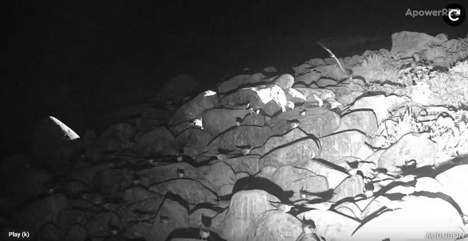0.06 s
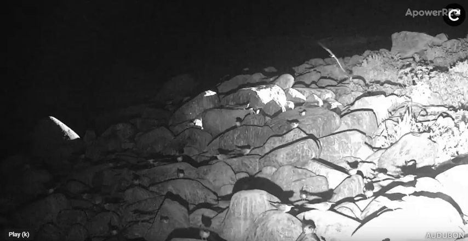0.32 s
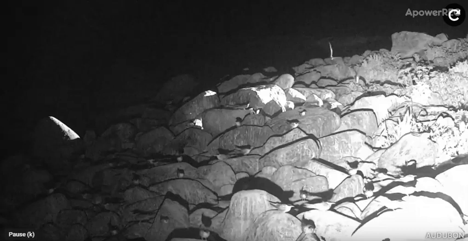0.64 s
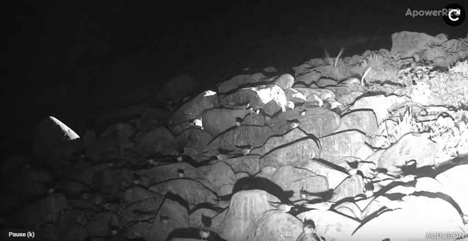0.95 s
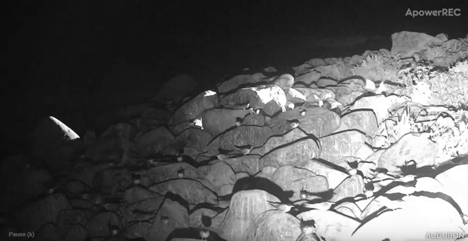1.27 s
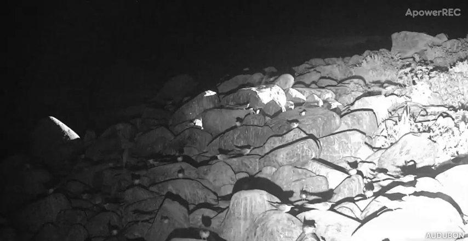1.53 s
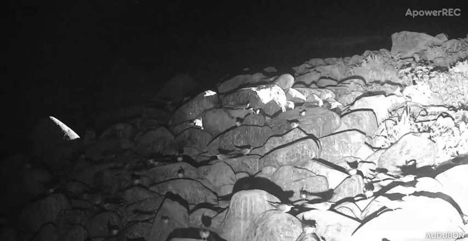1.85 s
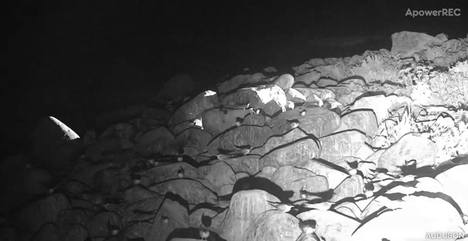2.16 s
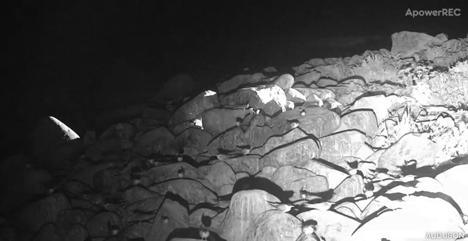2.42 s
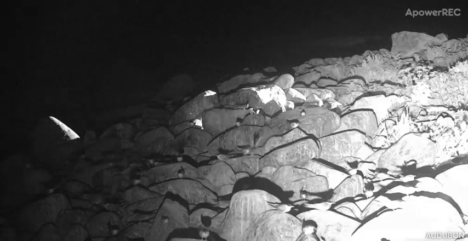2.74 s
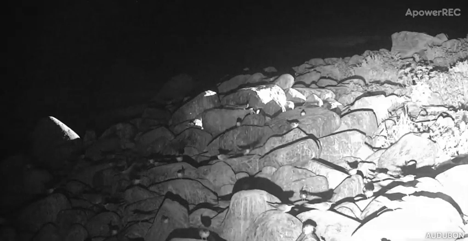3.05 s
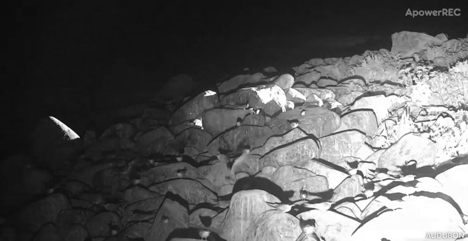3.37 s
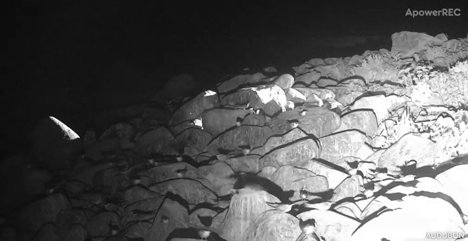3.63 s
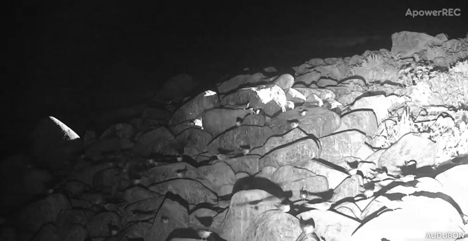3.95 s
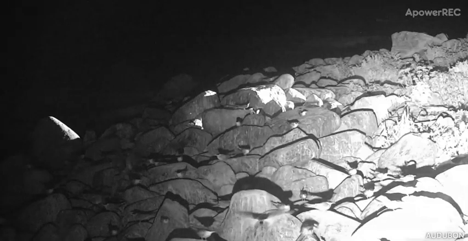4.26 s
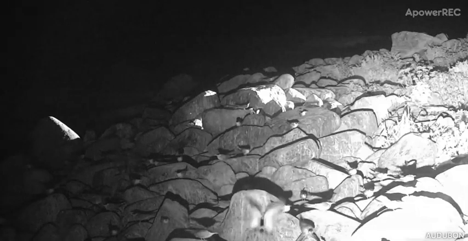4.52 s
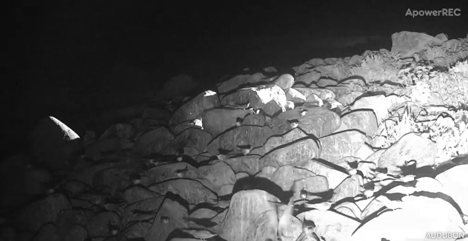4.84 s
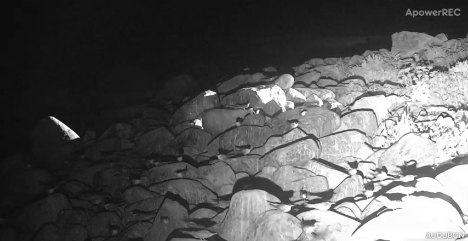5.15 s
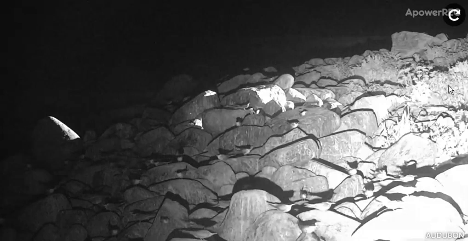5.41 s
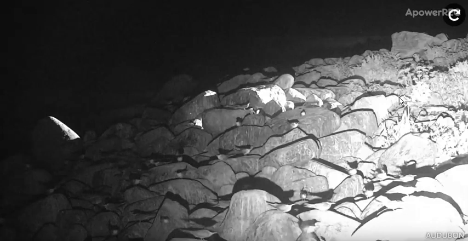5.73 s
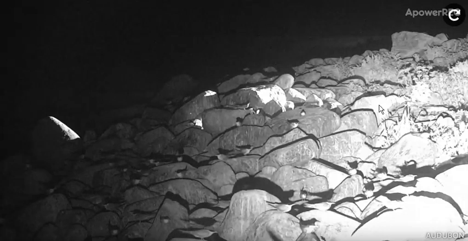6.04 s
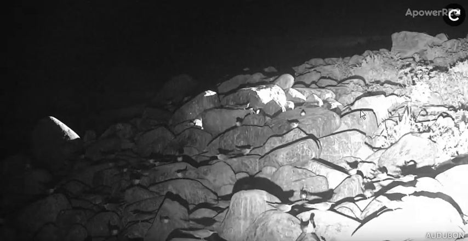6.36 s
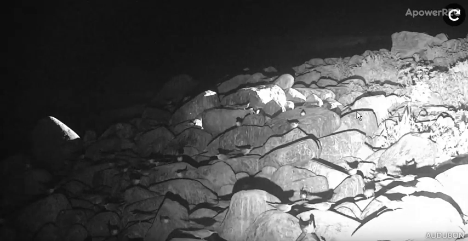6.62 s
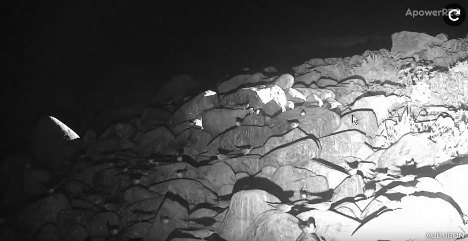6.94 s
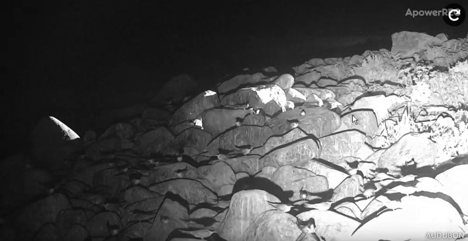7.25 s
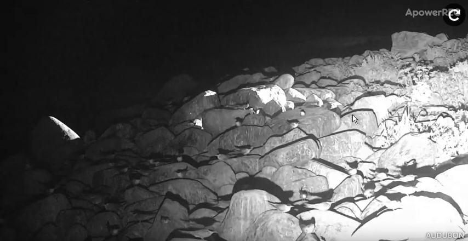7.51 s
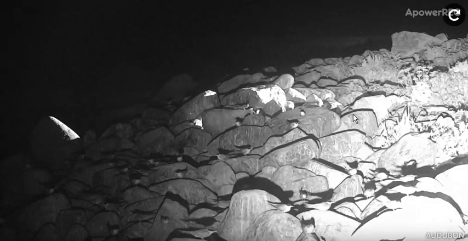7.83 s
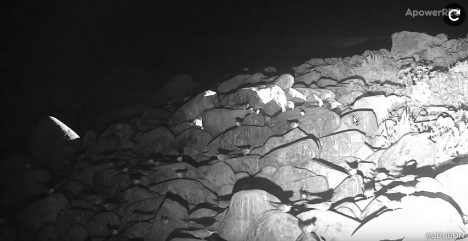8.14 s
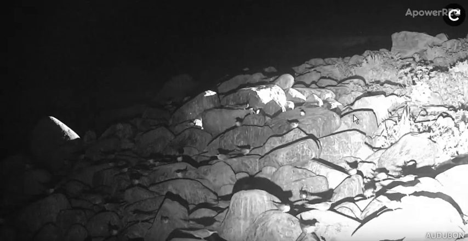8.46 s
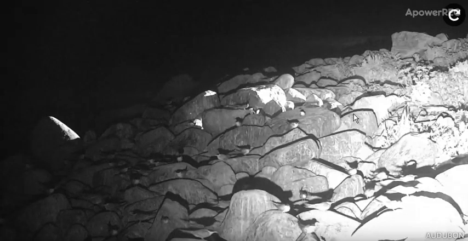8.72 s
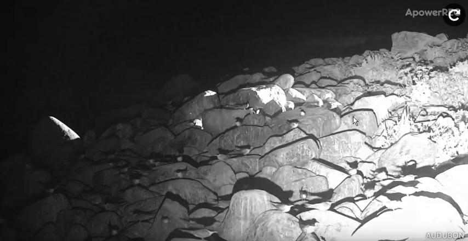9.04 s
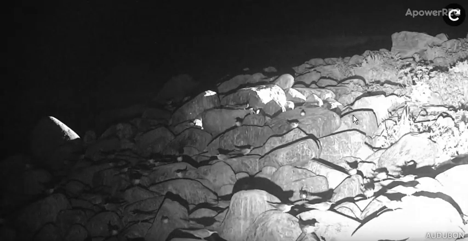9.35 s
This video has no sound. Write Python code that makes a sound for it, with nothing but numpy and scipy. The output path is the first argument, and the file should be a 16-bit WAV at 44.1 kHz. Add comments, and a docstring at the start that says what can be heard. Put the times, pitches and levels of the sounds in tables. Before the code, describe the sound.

After a moment of silence, a fixed microphone picks up seabirds calling among shoreline boulders at night. High wails crack into rasps over steady, hoarse chatter and scattered squeals. Later come fast, fluttering growls, a rising run of clucks and a brief, close shriek, the loudest sound. The whole scene is fairly quiet, backed by the far colony, a low wash of surf, soft wind, hiss and slight electrical buzz.

```python
"""A rocky shore at night, in a seabird colony, on the microphone of a fixed camera that comes on late.
Close by, one bird wails and breaks into rasps, one growls, one chatters, one clucks; others squeal among
the boulders and one shrieks. The voices are harmonic tones and snaps of the syrinx, shaped by the throat
and scattered by the rocks. Farther off lie the rest of the colony and the surf; at the microphone,
slow wind pressure, hiss and a thin mains buzz."""
import sys
import numpy as np
from scipy import signal
from scipy.fft import rfft, irfft, next_fast_len
from scipy.io import wavfile
from scipy.ndimage import map_coordinates

SR = 44100
rng = np.random.default_rng(int(sys.argv[2]) if len(sys.argv) > 2 else 0)


def wav_record(signal):
    """Record a signal, one row per channel, as 16-bit PCM in the file named by sys.argv[1]."""
    frames = np.transpose(np.atleast_2d(signal))
    bounded = np.clip(frames, -1, 1)
    # unit amplitude maps onto the largest positive 16-bit level
    quanta = np.round(bounded * 32767).astype(np.int16)
    wavfile.write(sys.argv[1], SR, quanta)


N = 422478
TIME = np.arange(N) / SR


def amp(db):
    """Decibels to gain."""
    return 10 ** (np.asarray(db) / 20)


def unit(x):
    """Scale to rms 1."""
    return x / np.sqrt(np.mean(x ** 2) + 1e-20)


def along(points, hz):
    """Read (frequency [Hz], value) points on a log axis."""
    f, v = np.transpose(points)
    return np.interp(np.log(hz + 1), np.log(f + 1), v)


def span(length):
    """The seconds since the start of a call, one per sample."""
    return np.arange(round(length * SR)) / SR


def envelope(t, attack_s, release_s):
    """Gain that rises, holds and falls."""
    return np.clip(np.minimum(t / attack_s, (t[-1] - t) / release_s), 0, 1)


def wobble(rate, size):
    """A smooth random curve, rate knots a second."""
    knots = rng.standard_normal(int(size * rate / SR) + 4)
    return map_coordinates(knots, [np.arange(size) * rate / SR], mode="nearest")


def add(track, start, x, fade_s=.019):
    """Mix x into the track at start seconds, with soft ends."""
    k = np.arange(len(x))
    part = track[round(start * SR):][:len(x)]
    part += (x * np.clip(np.minimum(k, k[::-1]) / (fade_s * SR), 0, 1))[:len(part)]


def filtered(x, response):
    """Filter x by a gain that is a function of frequency."""
    m = next_fast_len(x.shape[-1] + 8192)
    return irfft(rfft(x, m) * response(np.fft.rfftfreq(m, 1 / SR)), m)[..., :x.shape[-1]]


def coloured(x, spectrum):
    """Shape x by (frequency [Hz], gain [dB]) points; rms 1."""
    return unit(filtered(x, lambda hz: amp(along(spectrum, hz))))


def noise(spectrum):
    """Coloured noise of rms 1."""
    return coloured(rng.standard_normal(N), spectrum)


def wide_noise(spectrum, side_db):
    """Stereo noise from independent mid and side signals."""
    return noise(spectrum) + amp(side_db) * noise(spectrum) * np.array([[1], [-1]])


def throat(x, modes):
    """Ring x through resonances (centre [Hz], width [Hz], gain [dB]); rms 1."""
    m = next_fast_len(len(x) + 4096)
    f = np.abs(np.fft.fftfreq(m, 1 / SR))
    gain = sum(amp(db) / (1 + 2 * ((f - hz) / width) ** 2) for hz, width, db in modes)
    causal = np.exp(np.conj(signal.hilbert(np.log(gain))))  # the ring follows each snap
    causal *= f ** 2 / (f ** 2 + 500 ** 2)  # a small beak radiates no bass
    return unit(np.fft.ifft(np.fft.fft(x, m) * causal).real[:len(x)])


def creak(size, pulse_hz, jitter, breath):
    """Uneven snaps of the syrinx mixed with rushing air."""
    cycles = np.cumsum(pulse_hz * np.exp(jitter * wobble(pulse_hz, size))) / SR + rng.random()
    snaps = np.diff(np.floor(cycles), prepend=0) * amp(1.04 * wobble(pulse_hz, size))
    return unit(snaps) + breath * rng.standard_normal(size)


def flutter(size, rate_hz, depth_db, drift=.027):
    """A nearly regular throb of the air stream, rms 1."""
    cycles = np.cumsum(rate_hz * (1 + drift * wobble(36, size))) / SR + rng.random()
    return unit(amp(depth_db * np.cos(2 * np.pi * cycles)))


def partials(pitch, rough):
    """Six harmonics of rms 1, one a row; roughness shakes their pitch and strength."""
    size = len(pitch)
    shake = 1 + .08 * rough * wobble(900, size) + .005 * wobble(45, size)
    phase = 2 * np.pi * np.cumsum(pitch * shake) / SR
    return np.array([unit(np.sin(k * phase) * amp(3.45 * min(k, 3) * rough * wobble(300, size)))
                     for k in range(1, 7)])


def harmonic_gains(pitch, colour):
    """Each harmonic's gain through a throat colour (frequency [Hz], gain [dB])."""
    return amp(along(colour, np.outer(np.arange(1, 7), pitch)))


def voiced(pitch, rough, colour):
    """A harmonic voice through a throat colour, with steady power."""
    gains = harmonic_gains(pitch, colour)
    return np.sum(partials(pitch, rough) * gains, axis=0) / np.linalg.norm(gains, axis=0)


def cry(length, top_hz, fall, throat_hz):
    """An arched cry carried by the harmonic nearest the throat resonance; it cracks as it drops."""
    u = span(length) / length
    crest = .287  # share of the length at which the arch is highest
    pitch = top_hz * (1 - fall * ((u - crest) / (1 - crest)) ** 2)
    hoarseness = top_hz / throat_hz  # cries on the fundamental are hoarse, on a high harmonic clear
    rough = .46 * hoarseness + (1 - pitch / top_hz)
    pitch *= 1 + .0222 * hoarseness ** 2 * wobble(118.8, len(u))
    colour = np.array([(.5, -10), (1, 0), (1.35, -16), (2.4, -24), (3.5, -40)]) * [throat_hz, 1]
    return unit(amp(3.2 * wobble(69, len(u)))) * voiced(pitch, rough, colour)


def boulders(x, side_db, t60, wet_db=-10):
    """Near rocks scatter the sound and widen it; the slope adds a faint long tail."""
    t = span(.5)
    tail = lambda decay_s: unit(rng.standard_normal(len(t)) * amp(-60 * t / decay_s)) / np.sqrt(len(t))
    echo = lambda db: signal.fftconvolve(x, amp(db) * tail(t60) + amp(-19) * tail(.3))[:N]
    return x + echo(wet_db) + echo(side_db) * np.array([[1], [-1]])


def hiss():
    """Steady hiss, largely separate in each channel."""
    # hiss spectrum (frequency [Hz], gain [dB])
    spectrum = [(150, -50), (400, -8), (900, 2), (3000, 4), (6000, 2), (9000, -.5), (15000, -1),
                (15900, -18)]
    return amp(-69.5) * wide_noise(spectrum, side_db=1.5)


def buzz(mains_hz=60.14):
    """The mains supply leaks a few sharp spikes each half cycle."""
    # switching spikes (place in the half cycle [0-1], relative level [dB])
    switching = [(0.16, 32.5), (.855, 33), (1, -14.5)]
    spikes = np.zeros(N)
    for place, db in switching:
        samples_away = ((2 * mains_hz * TIME - place + .5) % 1 - .5) * SR / (2 * mains_hz)
        spikes += amp(db) * np.sinc(samples_away) * np.exp(-(samples_away / 8) ** 2)
    colour = [(30, -17), (120, 11.5), (800, 2.5), (5000, 5.5), (11000, .5), (15500, -3)]
    return amp(-66) * coloured(spikes * amp(1.5 * wobble(300, N)), colour)


def wind():
    """Slow gusts press on the microphone, in mono and mostly below hearing."""
    # gusts (time [s], half width [s], relative level [dB])
    gusts = [(1.3, 0.17, -56), (1.8, 0.11, -46), (2.02, 0.12, -40.5), (2.4, 0.27, -51.5), (4.7, 0.14, -48),
             (5.1, 0.29, -52.5), (6.6, .4, -56.5), (7.8, 0.11, -56), (8.7, 0.6, -58.5)]
    # buffeting spectrum (frequency [Hz], gain [dB])
    buffet = [(1, 7), (4, 22.5), (10, 5.5), (20, -8), (30, -11.5), (45, -28), (65, -29), (120, -42),
              (400, -102), (2000, -120)]
    calm = amp(-69)
    pressure = calm + sum(amp(db) * np.exp(-((TIME - s) / width) ** 2) for s, width, db in gusts)
    return amp(23) * pressure * noise(buffet)


def surf():
    """Distant surf: a low wash, nearly mono, that slowly swells and sinks."""
    # spectrum of the wash (frequency [Hz], gain [dB])
    spectrum = [(26, -32), (45, -6), (59, -9.5), (99, -8), (141, -15.5), (193, -11.5), (277, -17.5),
                (347, -11.5), (384, -17), (424, -14), (481, -23), (580, -14), (634, -19), (774, -28),
                (900, -31), (1170, -22), (1980, -120)]
    # swell of the sea (time [s], level [dB])
    swell = [(.6, -61), (1.6, -66), (2.7, -64.5), (3.6, -62.5), (5, -62), (7.7, -60.5), (9.5, -62.5)]
    wash = wide_noise(spectrum, side_db=-22)
    return amp(np.interp(TIME, *np.transpose(swell)) + .38 * wobble(2.7, N)) * wash


def colony():
    """Many far birds merge into a restless rattle."""
    # spectrum of the far voices (frequency [Hz], gain [dB])
    far_voices = [(700, -11.5), (950, 3.5), (1250, 8.5), (1650, 3), (2300, 5), (3100, 2.5), (4200, -11.5),
                  (6500, -27), (10000, -56)]
    restless = amp(1.7 * wobble(12, N) + 2.2 * wobble(130, N))
    return amp(-60.5) * unit(noise(far_voices) * restless)


def squeals():
    """Birds among the boulders throw in short arched cries."""
    # cries (time [s], length [s], top pitch [Hz], fall [share of pitch], relative level [dB],
    # throat resonance [Hz])
    calls = [(0.588, 0.024, 954, .01, -48.5, 1130), (.70, .062, 1860, 0.018, -53.5, 3740),
             (1.595, 0.17, 1997, 0.054, -55.5, 1950), (1.66, 0.22, 1500, 0.079, -59, 2930),
             (1.85, 0.14, 1830, .07, -66, 3700), (2.033, 0.14, 1945, 0.21, -59, 3700),
             (2.621, .042, 1690, 0.033, -50.5, 1750), (2.941, .13, 1458, 0.023, -57, 2920),
             (3.613, 0.063, 1985, 0.048, -49.5, 3900), (3.74, 0.047, 1760, 0.084, -53.5, 3960),
             (3.991, 0.038, 1100, 0.056, -53, 1100), (4.04, .15, 1180, .08, -60, 1150),
             (4.448, .155, 1837, 0.039, -57.5, 3550), (5.351, 0.042, 1815, .02, -57, 3550),
             (5.387, 0.21, 1325, .04, -52.5, 1300), (5.949, 0.049, 1790, .13, -57, 5160),
             (6.028, .23, 1486, .045, -56, 2950), (6.04, 0.202, 1175, 0.035, -59, 1150),
             (6.66, .16, 1333, 0.24, -57.5, 1300), (7.12, 0.078, 1543, 0.13, -59.5, 2900),
             (7.313, 0.13, 1285, 0.041, -53.5, 1310), (7.351, .23, 1890, 0.09, -56.5, 3600),
             (7.62, 0.26, 1573, .07, -63.5, 3140), (8.517, 0.23, 1773, 0.063, -61, 3600),
             (9.193, 0.033, 2370, .01, -51.5, 2400), (9.39, 0.16, 1838, .05, -59, 3700)]
    out = np.zeros(N)
    for start, length, hz, fall, db, throat_hz in calls:
        add(out, start, amp(db - 1) * cry(length, hz, fall, throat_hz), fade_s=length * .044)
    return out


def shriek():
    """Near the microphone, a clear cry collapses into a rough squawk."""
    # course of the cry (time [s], pitch [Hz], level [dB], roughness [0 = clear])
    course = [(8.59, 1755, -56, .15), (8.598, 1805, -37, 0.14), (8.612, 1840, -34, 0),
              (8.625, 1826, -36.5, 0.15), (8.636, 1680, -37.5, 0.1), (8.645, 1320, -42, 1.1),
              (8.657, 1305, -39, 0.56), (8.672, 1290, -65, 0.2)]
    # throat colour (frequency [Hz], gain [dB])
    colour = [(1300, 3), (1850, -11), (2600, 12), (3700, -2.5), (5500, -5.5), (7000, -26), (9300, -34.5),
              (13000, -45)]
    times, *columns = np.transpose(course)
    t = np.arange(round(times[0] * SR), round(times[-1] * SR)) / SR
    pitch, db, rough = (np.interp(t, times, column) for column in columns)
    out = np.zeros(N)
    add(out, t[0], amp(db) * voiced(pitch, rough, colour), fade_s=.002)
    return out


def clucks():
    """Very short bursts ring the throat: a few single ones, then a quick run that grows louder."""
    # single clucks (time [s], relative level [dB])
    singles = [(5.7807, -49.5), (6.538, -51), (6.567, -46.5), (6.713, -41.5), (7.7274, -45)]
    # throat resonances (centre [Hz], width [Hz], gain [dB])
    modes = [(1440, 440, -8), (2530, 280, 8.5), (3300, 410, -7.5), (4600, 630, -15)]
    gap_s, slowing_s, growth_db = .0845, .0002, .8
    run = [(7.8005 + k * (gap_s + k * slowing_s), -42 + k * growth_db) for k in range(9)]
    out, t = np.zeros(N), span(.05)
    for start, db in [*singles, *run]:
        air = creak(len(t), pulse_hz=702.4, jitter=.15, breath=.62) * t * np.exp(-t / .0045)
        add(out, start, amp(db - 11) * throat(air, modes), fade_s=.00077)
    return out


def chatter(syllable_s=.087, spacing_s=.193):
    """Hoarse syllables, a creak around a cracked tone, start sharply and sag, about five a second."""
    # stretches in even tempo (first syllable [s], last syllable [s], relative level [dB])
    stretches = [(0.636, 1.405, -51.5), (1.6, 2.554, -52.5), (2.73, 4.101, -53), (4.287, 5.225, -53.5),
                 (5.425, 6.419, -51.5), (6.619, 7.808, -51), (7.998, 8.571, -51), (8.771, 9.535, -49.5)]
    # throat resonances (centre [Hz], width [Hz], gain [dB])
    modes = [(1230, 254, 4.5), (1920, 340, 3), (2520, 164, 4.5), (3740, 520, -4), (4860, 1030, -16.5)]
    colour = [(2000, 3.5), (4000, -9), (6000, -27), (9000, -35)]
    out, u = np.zeros(N), np.linspace(0, 1, int(syllable_s * SR))
    push = amp(-17 * u ** 3 + 1.4 * np.cos(2 * np.pi * 2.04 * u))  # two pushes to a syllable
    for first, last, db in stretches:
        for start in np.linspace(first, last, round((last - first) / spacing_s) + 1):
            air = creak(len(u), pulse_hz=400, jitter=.1, breath=.45)
            bend = .03 * rng.standard_normal() + .0595 * np.sin(np.pi * u) + rng.normal(.022, .07) * u
            tone = voiced(1990 * (1 + bend), rough=.34, colour=colour)
            voice = throat(air, modes) + amp(-.5) * tone
            add(out, start, amp(db - 2) * push * voice, fade_s=.0019)
    return out


def growls(fade_db_per_s=10.5):
    """Snaps and a cracked tone throb fast; the throat's upper resonances sink through each growl."""
    # growls (time [s], length [s], relative level [dB], weight of low resonances [dB], throb [Hz])
    calls = [(4.449, .32, -49, -9, 60), (4.88, .3, -48.5, -7.5, 63), (5.41, 0.36, -52, -8, 49),
             (5.856, 0.21, -43.5, -11.5, 35.5), (6.0, .31, -47, -6, 49), (6.26, 0.28, -47.5, -8.5, 59),
             (6.795, .38, -44.5, -14, 59), (8.06, 0.43, -44.5, -11.5, 62), (8.679, .18, -52.5, -7, 61.4)]
    # lower and upper throat resonances (nominal centre [Hz], width [Hz], gain [dB])
    low_modes = [(1016, 55, -7), (1308, 210, -0.5)]
    high_modes = [(2192, 210, 6.5), (2617, 47, 6), (3360, 160, -8), (4000, 126, -14)]
    # colour of the cracked tone (frequency [Hz], gain [dB])
    colour = [(1150, -4.5), (2300, 3.5), (3450, -19), (4600, -20), (7000, -40)]
    out = np.zeros(N)
    for start, length, db, low_db, throb_hz in calls:
        t = span(length)
        u = t / length
        throb = flutter(len(t), throb_hz, depth_db=5, drift=.043)
        air = creak(len(t), pulse_hz=233.8, jitter=.12, breath=.36) * throb
        tense, slack = (throat(air, np.multiply(high_modes, [tune, 1, 1])) for tune in (1.06, .99))
        upper = unit((1 - u) * tense + u * slack)
        lower = amp(low_db + 1.5) * throat(air, low_modes)
        tone = amp(-6) * voiced(np.linspace(1203, 1055, len(t)), rough=.6, colour=colour) * throb
        effort = amp(db - 1.5 - fade_db_per_s * (t - length / 2))
        effort *= envelope(t, attack_s=.035, release_s=.089)
        add(out, start, effort * (upper + lower + tone), fade_s=.003)
    return out


def gulps(length=.046):
    """A short cry breaks into each rasp, plunging in pitch and ending in a low croak."""
    # gulps (time [s], top pitch [Hz], relative level [dB])
    calls = [(1.28, 1442, -43), (2.715, 1446, -45), (3.775, 1223, -44.5)]
    # colour of the croak (frequency [Hz], gain [dB])
    colour = [(200, -25), (400, -7), (1100, -2), (1700, -4), (2400, 6), (4000, -26), (8000, -50)]
    out, t = np.zeros(N), span(length)
    for start, hz, db in calls:
        croak = coloured(creak(len(t), pulse_hz=373, jitter=.171, breath=.31), colour)
        voice = cry(length, hz, fall=.362, throat_hz=1270) + amp(.5) * t / length * croak
        add(out, start, amp(db - 4.5) * voice, fade_s=.0039)
    return out


def rasps():
    """The wail breaks into a harsh, fluttering creak in which a cracked tone keeps sinking."""
    # rasps (time [s], length [s], relative level [dB])
    calls = [(1.11, 0.18, -45), (2.65, .21, -47), (3.688, .16, -54)]
    # throat resonances (centre [Hz], width [Hz], gain [dB])
    modes = [(1314, 590, -10), (2290, 540, 8.5), (2780, 340, 7.5), (3650, 700, -11.5)]
    colour = [(1300, -13), (2600, 3), (4000, -12), (8000, -39)]
    out = np.zeros(N)
    for start, length, db in calls:
        t = span(length)
        air = throat(creak(len(t), pulse_hz=370, jitter=.15, breath=.45), modes)
        tone = voiced(np.linspace(1390, 1220, len(t)), rough=.564, colour=colour)
        voice = (air + amp(-2) * tone) * flutter(len(t), rate_hz=38.8, depth_db=2)
        add(out, start, amp(db - 2) * envelope(t, attack_s=.04, release_s=.027) * voice)
    return out


def wails():
    """A held whistle with a strong octave that grows hoarse as the breath runs out."""
    # wails (time [s], length [s], nominal pitch [Hz], final drop [Hz], fundamental level [dB],
    # relative overtone level [dB], roughness [0-1])
    calls = [(0.687, .47, 1485, 100, -49.3, -50, 0.24), (2.28, 0.39, 1480, 186, -56, -54, 0.33),
             (3.284, 0.228, 1468, 22, -56, -57, 0.17), (3.513, 0.2, 1462, 31, -54, -52.5, .36),
             (4.641, 0.32, 1452, 17.4, -56.5, -60.5, 0.34)]
    # throat colour on the overtones (frequency [Hz], gain [dB])
    colour = [(1400, 21), (2900, 5), (4400, -12), (5900, -21.5), (9000, -55)]
    scoop_hz, scoop_s, sag_hz_per_s, drop_s = 90, .01404, 85, .06
    fade_db_per_s, swell_db_per_s = 12, 10  # strength moves from the fundamental to the overtones
    out = np.zeros(N)
    for start, length, hz, drop_hz, low_db, high_db, rough in calls:
        t = span(length)
        pitch = hz - scoop_hz * np.exp(-t / scoop_s) - sag_hz_per_s * t
        pitch -= drop_hz * np.exp((t - length) / drop_s)
        waver = 1 + .0292 * rough * wobble(89.9, len(t))
        stack = partials(pitch * waver, rough=rough + .25 * (t / length) ** 4)
        overtones = np.sum((stack * harmonic_gains(pitch, colour))[1:], axis=0)
        overtones *= flutter(len(t), rate_hz=38, depth_db=1)
        past_middle = t - length / 2
        overtones *= amp(high_db - 2.5 + swell_db_per_s * past_middle)
        fundamental = amp(low_db - fade_db_per_s * past_middle) * stack[0]
        tremble = unit(amp(3 * wobble(60.3, len(t))))
        add(out, start, tremble * (fundamental + overtones))
    return out


def scene():
    """Each near bird sits in its own nook among the rocks, with the colony and the sea behind."""
    growler = boulders(growls(), side_db=-3.5, t60=.074, wet_db=-4)
    wailer = boulders(wails(), side_db=-5, t60=.09, wet_db=-15)
    wailer += boulders(rasps() + gulps(), side_db=-4, t60=.06)
    neighbours = (boulders(chatter(), side_db=-5, t60=.17)
                  + boulders(clucks(), side_db=-4, t60=.12)
                  + boulders(squeals(), side_db=-4.5, t60=.1)
                  + boulders(shriek(), side_db=-4.5, t60=.08))
    far_birds = boulders(colony(), side_db=-4, t60=.076)
    return growler + wailer + neighbours + far_birds + surf() + wind() + hiss() + buzz()


def record(dry):
    """The camera's microphone switches on after a moment; nothing above the band limit is kept."""
    on_s, top_hz = .587, 15700
    switch = np.clip((TIME - on_s) / .004, 0, 1)
    return filtered(dry * switch, lambda hz: hz < top_hz)


dry = scene()
out = record(dry)
wav_record(out)
```